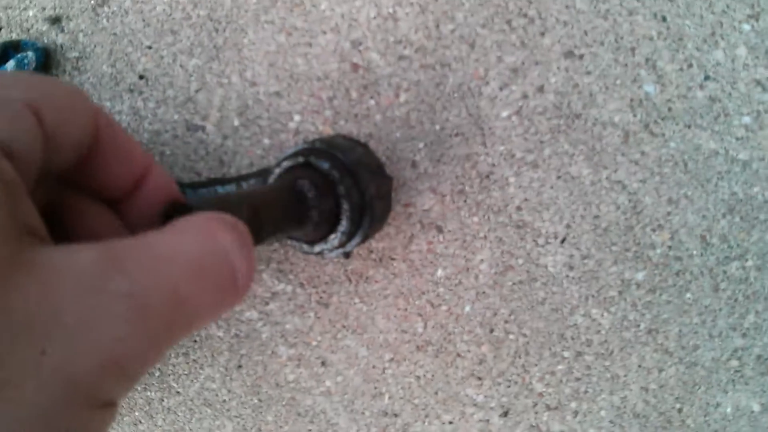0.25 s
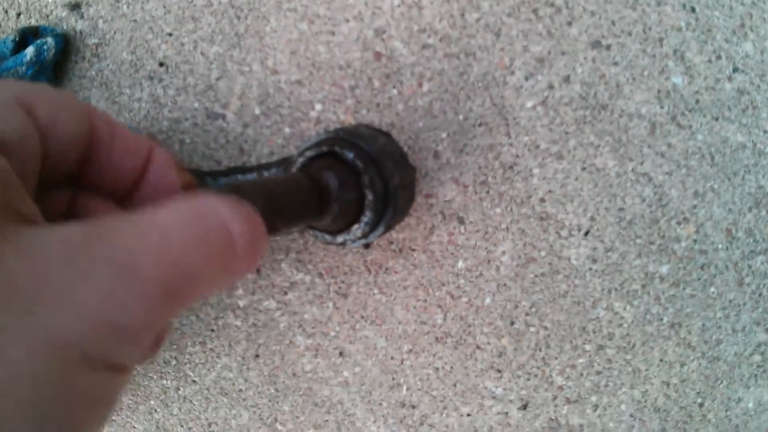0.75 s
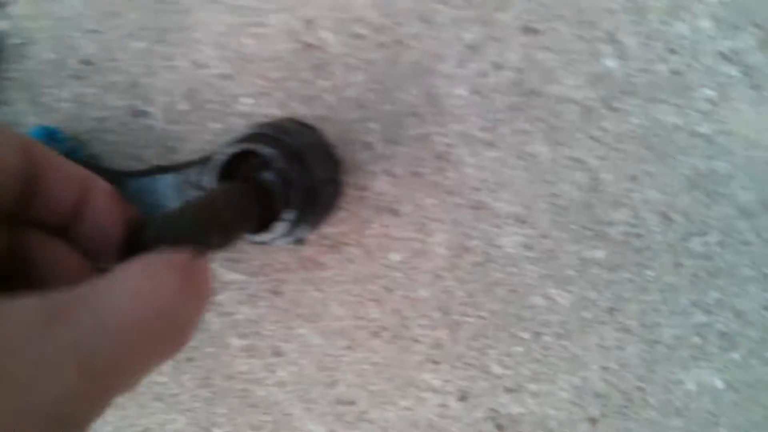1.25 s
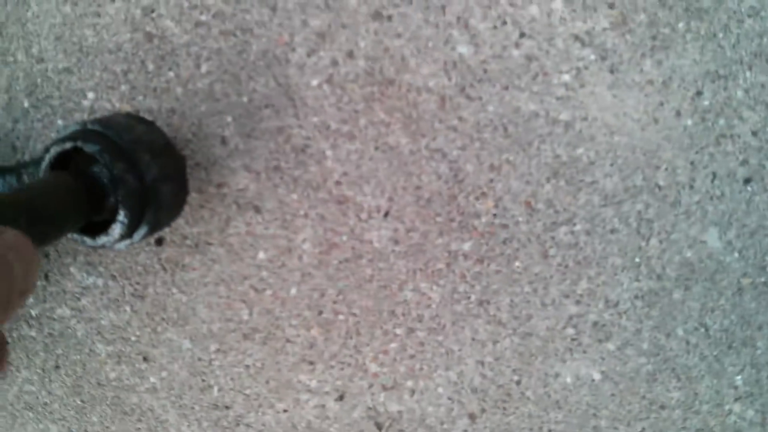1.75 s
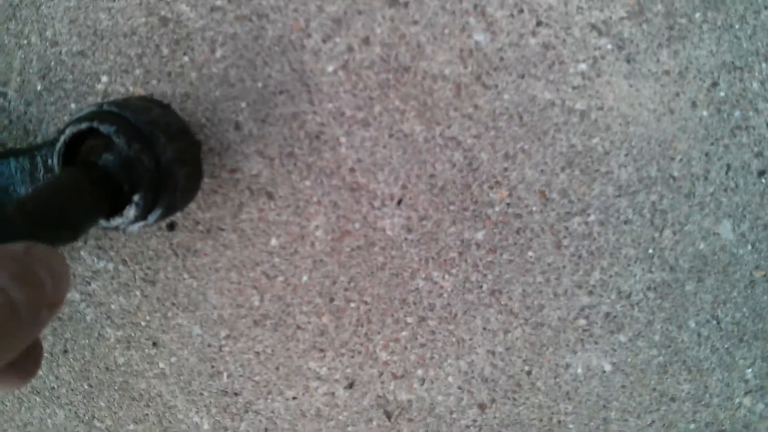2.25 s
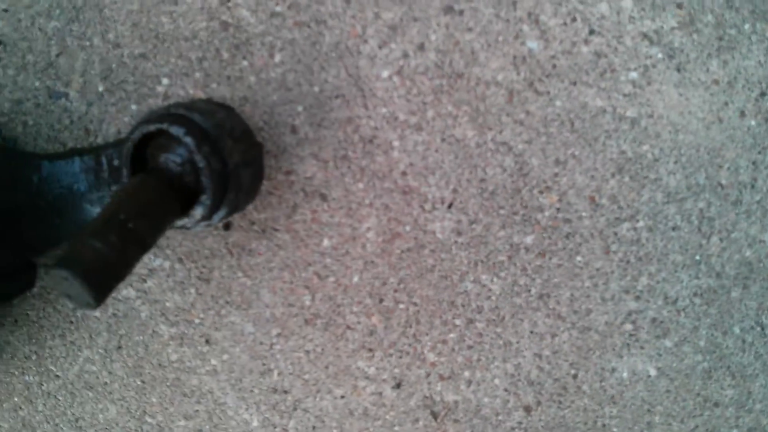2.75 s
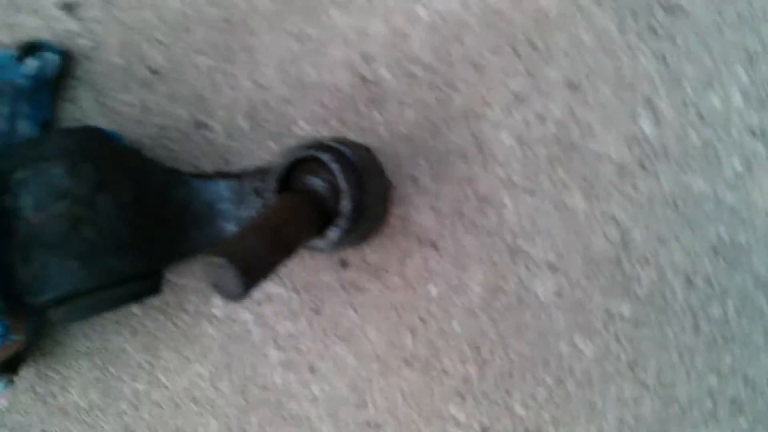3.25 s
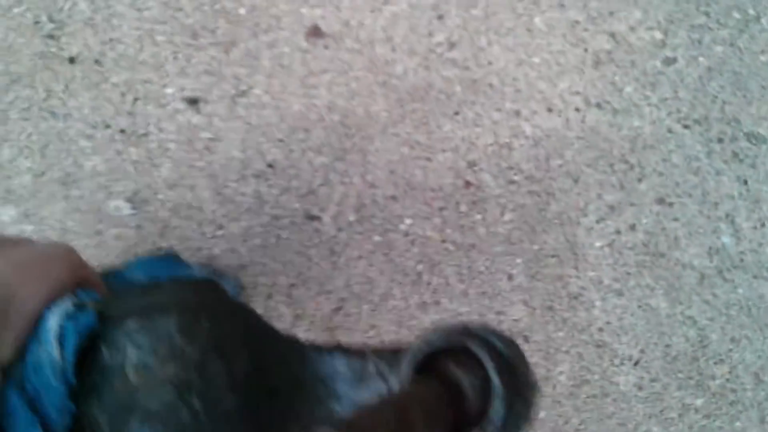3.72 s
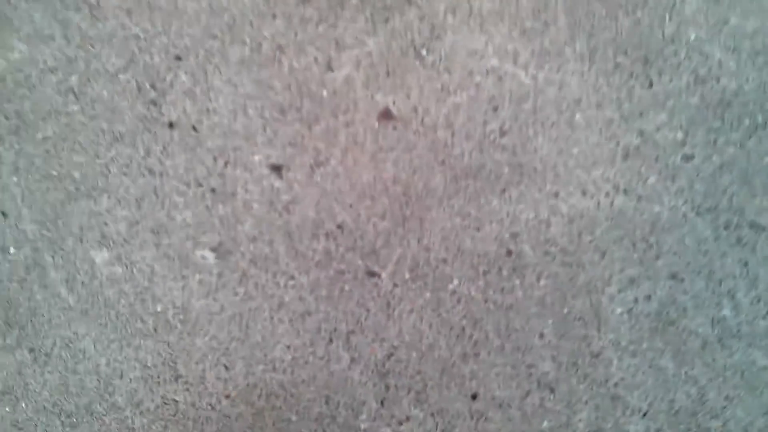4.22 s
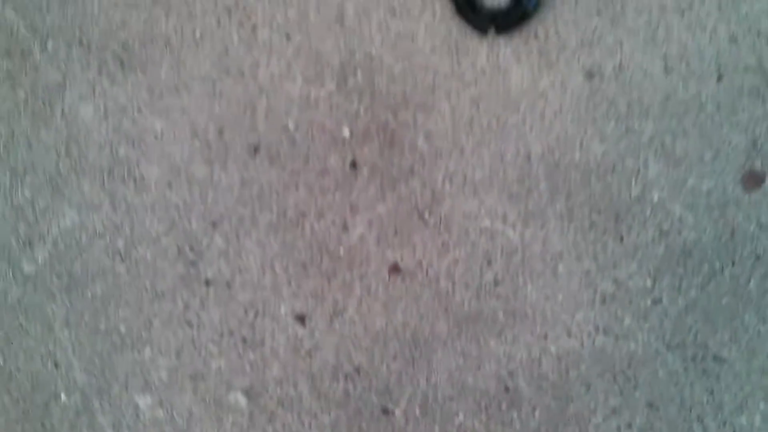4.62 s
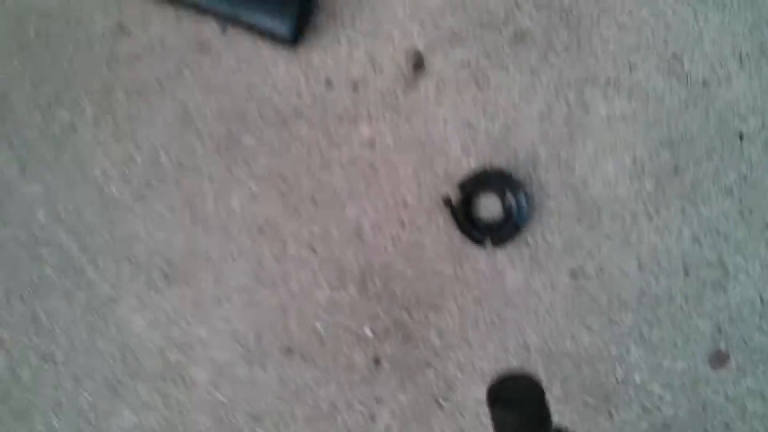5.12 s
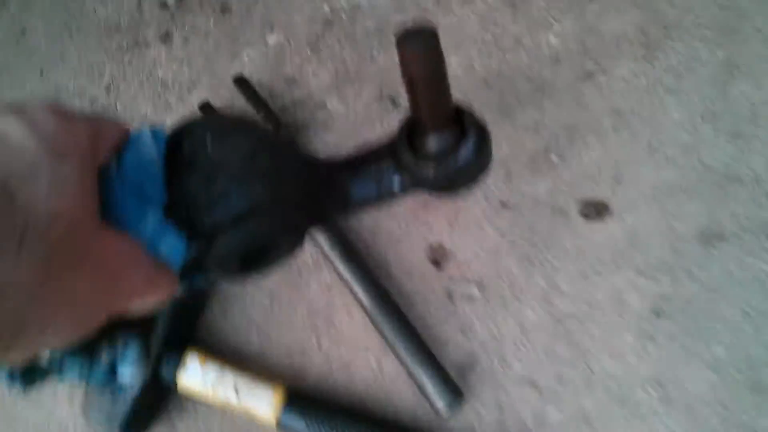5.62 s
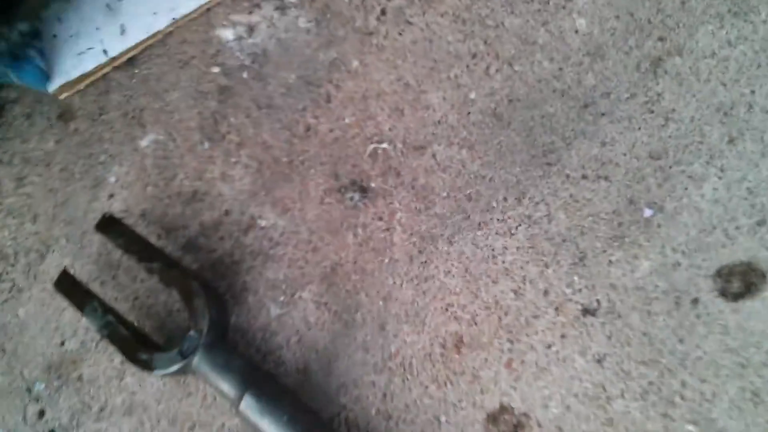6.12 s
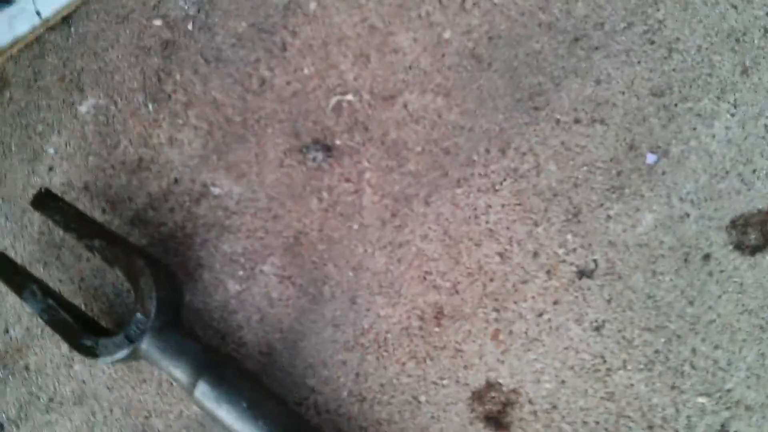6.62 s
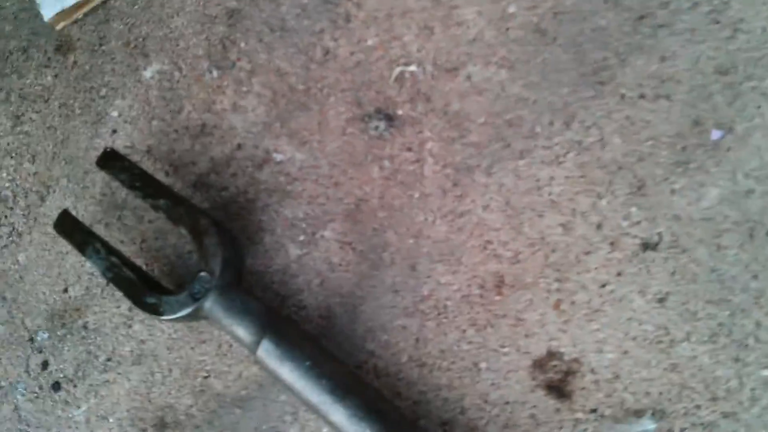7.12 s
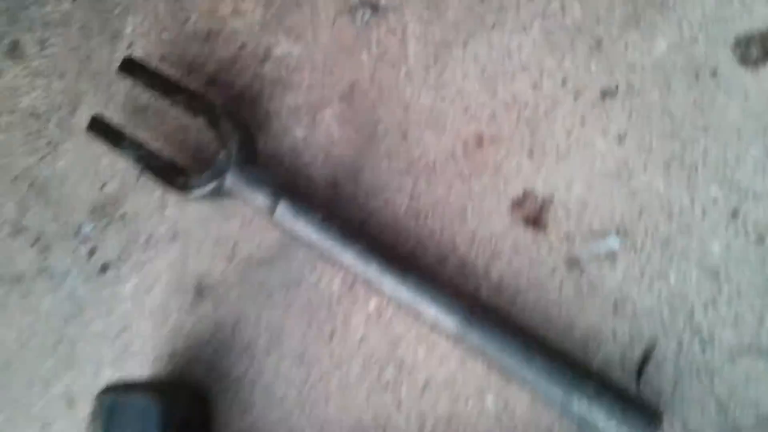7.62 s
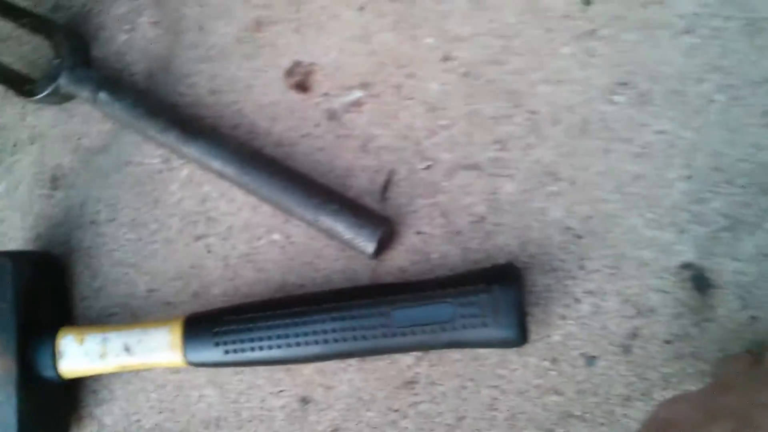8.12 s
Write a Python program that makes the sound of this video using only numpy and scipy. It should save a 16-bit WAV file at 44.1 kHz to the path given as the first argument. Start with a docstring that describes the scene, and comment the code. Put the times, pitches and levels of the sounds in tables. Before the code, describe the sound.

Over dull outdoor rumble, a faint drone and light hiss, a metal stud clicks and rubs in its socket close to the microphone. It pauses, then steel scrapes down on the concrete with a brief high ring. Two bursts of loud, crunching tool blows and ticks follow, slightly rounded off by the microphone, with a short garage reflection, light final ticks and a soft swish.

```python
"""A worn ball joint is waggled by hand over a garage floor: it clacks, and short ringing clinks near 2.5 kHz
and faint high ringing rubs sound at the same time. The steel part is then put down, skidding with a short
bright ring, and hand tools are knocked about on the concrete. Ringing modes make the clinks and the skid;
coloured noise makes the rubbing and the knocks. Soft swishes come among the last knocks and at the end. Dull
outdoor noise, a far whir, a faint drone and a soft hiss lie underneath throughout; the close microphone rounds
off the loudest blows."""
import sys
import numpy as np
from scipy import signal
from scipy.fft import rfft, irfft, next_fast_len
from scipy.io import wavfile

SR = 44100
rng = np.random.default_rng(int(sys.argv[2]) if len(sys.argv) > 2 else 0)


def dump(signal):
    """Clip the signal to [-1, 1] and save it as 16-bit WAV at the path in sys.argv[1]."""
    limited = np.clip(np.atleast_2d(signal).T, -1, 1)
    pcm = np.round(limited * 32767).astype(np.int16)
    wavfile.write(sys.argv[1], SR, pcm)


N = 368676
TIME = np.arange(N) / SR  # seconds


def from_db(db):
    """Turn decibels into a gain."""
    return 10 ** (np.asarray(db) / 20)


def rms_one(x):
    """Scale a sound to unit power."""
    return x / np.sqrt(np.mean(x ** 2) + 1e-20)


def follow(rows):
    """Join the points of a (time, value) table into one value per sample."""
    return np.interp(TIME, *np.transpose(rows))


def colour(points, hz):
    """Gain of a spectrum drawn through (frequency, dB) points."""
    knots, db = np.transpose(points)
    return from_db(np.interp(np.log(hz + 1), np.log(knots), db))


def resonances(peaks, hz):
    """Gain of damped resonances, with their powers summed."""
    power = sum(from_db(db) ** 2 / (1 + (2 * (hz - centre) / width) ** 2) for centre, width, db in peaks)
    return np.sqrt(power)


def noise(gain_at, size, grain_db=0):
    """Coloured noise of unit power; uneven grain sizes make it gritty."""
    grains = rng.standard_normal(size) * from_db(grain_db * rng.standard_normal(size))
    padded = next_fast_len(size)
    hz = np.arange(padded // 2 + 1) * SR / padded
    filtered = irfft(rfft(grains, padded) * gain_at(hz), padded)
    return rms_one(filtered[:size])


def flutter(rate_hz, size):
    """Random motion of unit spread, mostly slower than rate_hz."""
    return noise(lambda hz: 1 / (1 + (hz / rate_hz) ** 2), size)


def narrow_noise(hz, blur_hz):
    """Noise of unit power gathered around a pitch that follows hz."""
    phase = 2 * np.pi * np.cumsum(hz) / SR
    return flutter(blur_hz, len(hz)) * np.cos(phase) + flutter(blur_hz, len(hz)) * np.sin(phase)


def blow(t, rise_s, t60_s):
    """Loudness of a blow: it grows while the contact builds, then falls 60 dB in t60_s."""
    rise_s = max(rise_s, 1 / SR)
    return np.minimum(t / rise_s, 1) * from_db(-60 * np.maximum(t - rise_s, 0) / t60_s)


def strokes(rows, attack_t60_s, release_t60_s):
    """Gain of sliding strokes: each fades in before its time, changes steadily in level, and dies away."""
    out = np.zeros(N)
    for s, length_s, db, swell_db in rows:
        t = TIME - s
        away = np.maximum(-t, 0) / attack_t60_s + np.maximum(t - length_s, 0) / release_t60_s
        near = away < 1  # beyond this the stroke is 60 dB down
        stroke_db = db + swell_db * np.clip(t[near] / length_s, 0, 1) - 60 * away[near]
        out[near] += from_db(stroke_db)
    return out


def add(track, s, sound):
    """Lay a sound into a track at time s."""
    start = round(s * SR)
    track[start:start + len(sound)] += sound[:N - start]


# colours of the three background noises: (frequency [Hz], gain [dB])
RUMBLE_COLOUR = [(20, -9), (45, 0), (90, -0.5), (140, -2), (200, 0.5), (420, -5), (560, -8.5), (720, -13),
                 (1200, -17.5), (3000, -43), (6000, -52)]
WHIR_COLOUR = [(400, -20), (750, -1.5), (950, -2.5), (1300, -11.5), (2200, -18), (3100, -43.5),
               (6000, -41.5)]
HISS_COLOUR = [(1500, -31), (3100, -23.5), (4500, -14.5), (5700, -8), (7000, -3), (8000, 0), (10000, -7),
               (12500, -9), (16000, -17.5)]
# their loudness, before the trims below: (time [s], level [dB])
RUMBLE_LEVEL = [(0.0, -47), (0.61, -47), (0.91, -46), (1.56, -46), (1.84, -46), (2.3, -45), (3.26, -50.5),
                (4.38, -47), (5.35, -52), (7.24, -49), (7.36, -45), (7.71, -49), (8.03, -46.5),
                (8.36, -46.5)]
WHIR_LEVEL = [(0, -52), (.35, -50), (1.9, -55), (2.35, -46), (2.8, -52), (4.7, -56), (5.2, -55),
              (6.3, -56.5), (7.0, -61), (8.36, -60)]
HISS_LEVEL = [(0.0, -48), (0.28, -51.5), (2.02, -47), (3.28, -50), (3.98, -46), (4.42, -46), (5.03, -49),
              (5.35, -42.5), (6.08, -49), (6.38, -50), (6.49, -43.5), (6.82, -47.5), (7.24, -50.5),
              (7.38, -42), (7.66, -46), (8.36, -51)]
RUMBLE_TRIM_DB, WHIR_TRIM_DB, HISS_TRIM_DB = 0, -1.0, 0.5
# pitch of the whine in the far whir: (time [s], frequency [Hz])
WHINE_PITCH = [(0, 935), (1.5, 919), (2.5, 951), (3.1, 887), (4.2, 870), (5.0, 986), (5.5, 1026),
               (6.2, 939), (8.36, 909)]


def background(whine_db=-3.5, whine_blur_hz=50):
    """Three coloured noises make outdoor rumble, far whir and soft hiss; narrow noise whines in the whir."""
    out = np.zeros(N)
    for level_rows, points, trim_db in ((RUMBLE_LEVEL, RUMBLE_COLOUR, RUMBLE_TRIM_DB),
                                        (WHIR_LEVEL, WHIR_COLOUR, WHIR_TRIM_DB),
                                        (HISS_LEVEL, HISS_COLOUR, HISS_TRIM_DB)):
        out += from_db(follow(level_rows) + trim_db) * noise(lambda hz: colour(points, hz), N)
    whine = narrow_noise(follow(WHINE_PITCH), whine_blur_hz)
    return out + from_db(follow(WHIR_LEVEL) + whine_db) * whine


# steady notes that rise and fall with the rumble: (frequency [Hz], level against RUMBLE_LEVEL [dB])
DRONE_NOTES = [(205, -10.5), (410, -15)]
# swells: (middle time [s], length [s], level of lower note [dB], lower note [Hz], upper note [Hz])
DRONE_SWELLS = [(0.798, .45, -46.5, 245, 290), (1.0, 0.33, -45, 330, 520), (1.421, 0.82, -47.5, 285, 456.5),
                (2.298, 0.54, -54, 235, 398), (4.251, .45, -51.5, 255, 493), (6.85, .5, -51.5, 200, 296),
                (8.049, .8, -49.5, 345.3, 417), (8.36, .3, -46.5, 170, 344)]


def drone(upper_db=0.5, blur_hz=32):
    """Two low, blurred notes within the rumble, with slow swells at other pitches."""
    notes = sum(from_db(db) * narrow_noise(np.full(N, hz), blur_hz) for hz, db in DRONE_NOTES)
    out = from_db(follow(RUMBLE_LEVEL)) * notes
    for s, length_s, db, lower_hz, upper_hz in DRONE_SWELLS:
        swell = np.hanning(round(length_s * SR))
        lower = narrow_noise(np.full(len(swell), lower_hz), blur_hz)
        upper = narrow_noise(np.full(len(swell), upper_hz), blur_hz)
        add(out, s - length_s / 2, from_db(db) * swell * (lower + from_db(upper_db) * upper))
    return out


GARAGE_T60_S, GARAGE_DB = 0.31, -14.5
# colour of the sound coming back from the walls: (frequency [Hz], gain [dB])
WALL_COLOUR = [(100, 8), (1000, 3.5), (2500, -3), (6000, 3.5), (10000, -5), (16000, -4.5)]


def garage(x, rise_s=0.0061):
    """The walls answer with a faint diffuse tail, made of fading coloured noise."""
    t = TIME[:SR]
    tail = noise(lambda hz: colour(WALL_COLOUR, hz), len(t)) * blow(t, rise_s, GARAGE_T60_S)
    return from_db(GARAGE_DB) * signal.fftconvolve(x, tail / np.linalg.norm(tail))[:N]


# swishes as the hand moves about:
# (middle time [s], length [s], level of the slide [dB], start pitch [Hz], end pitch [Hz])
SWISHES = [(6.664, 0.22, -49, 4600, 3800), (8.239, 0.3, -52, 4600, 3570)]


def swishes(blur_hz=330, rustle_db=-0.5, rustle_blur_hz=1100, rustle_ratio=1.4, patchy_db=1.5, patchy_hz=30):
    """Soft, uneven sliding noises that sink in pitch, with a broader rustle above."""
    out = np.zeros(N)
    for s, length_s, db, start_hz, end_hz in SWISHES:
        hz = np.linspace(start_hz, end_hz, round(length_s * SR))
        rustle = narrow_noise(rustle_ratio * hz, rustle_blur_hz)
        slide = narrow_noise(hz, blur_hz) + from_db(rustle_db) * rustle
        level = from_db(db + patchy_db * flutter(patchy_hz, len(hz)))
        add(out, s - length_s / 2, level * np.hanning(len(hz)) * slide)
    return out


# steel landing flat on the concrete: (time [s], level [dB], t60 [s])
THUDS = [(5.671, -23.5, 0.083), (5.8114, -21, 0.041), (6.384, -21.5, 0.1), (7.195, -23.5, 0.16),
         (7.24, -12, 0.12)]
THUD_RISE_S, THUD_LOW_DB, THUD_SPARKLE_DB = 0.0008, 20, -15
# hard blows on the concrete: (time [s], level [dB], rise [s], sparkle [dB])
STRIKES = [(6.3485, -1.5, 0.00063, 6.5), (6.4506, -23.5, .0005, -3), (7.251, -7.5, .005, 6.5),
           (7.315, -19, 0.0026, -2), (7.3887, -10.5, 0.00066, -6), (7.557, -38, .001, -12)]
STRIKE_T60_S, STRIKE_LOW_DB = 0.064, 1
# an edge ticking on the floor as a tool rocks: (time [s], level [dB])
TICKS = [(5.353, -36), (6.385, -17.5), (6.434, -14), (6.448, -8), (7.212, -10.5), (7.217, -13),
         (7.306, -16.5), (7.313, -17), (7.383, -22), (7.887, -35), (7.952, -34.5)]
TICK_RISE_S, TICK_T60_S, TICK_LOW_DB, TICK_SPARKLE_DB = .0005, 0.027, -6.5, 9.5
# steel scuffing over grit until it stops: (time [s], level [dB], rise [s], t60 [s], thud [dB])
SCUFFS = [(5.338, -27.5, 0.007, 0.19, -5), (5.473, -26, 0.0046, .098, -21),
          (5.802, -27.5, 0.0054, 0.092, 11), (6.341, -27, 0.0064, .05, 5),
          (6.4057, -19, 0.00092, 0.17, -1.5), (7.204, -20.5, 0.0089, 0.35, 4),
          (7.306, -27, 0.0072, 0.29, 11.5)]
SCUFF_SPARKLE_DB = -1.5


def floor_contacts():
    """Every meeting of steel and concrete as (time s, level dB, rise s, t60 s, thud dB, sparkle dB)."""
    thuds = [(s, db, THUD_RISE_S, t60, THUD_LOW_DB, THUD_SPARKLE_DB) for s, db, t60 in THUDS]
    strikes = [(s, db, rise, STRIKE_T60_S, STRIKE_LOW_DB, sparkle) for s, db, rise, sparkle in STRIKES]
    ticks = [(s, db, TICK_RISE_S, TICK_T60_S, TICK_LOW_DB, TICK_SPARKLE_DB) for s, db in TICKS]
    scuffs = [(s, db, rise, t60, thud, SCUFF_SPARKLE_DB) for s, db, rise, t60, thud in SCUFFS]
    return thuds + strikes + ticks + scuffs


FLOOR_HZ = 310  # pitch below which the concrete hardly gives
# colour of crushed grit under steel: (frequency [Hz], gain [dB])
GRIT_COLOUR = [(25, -10), (70, -5), (150, -0.5), (260, -5), (400, -5.5), (900, -2.5), (1500, 2),
               (2300, 0.5), (3200, -8), (4300, -3), (5900, 1), (8000, -1), (10000, -2.5), (13500, -2.5),
               (16000, -9.5)]
# short resonances of tool and floor, before body_db: (frequency [Hz], width [Hz], gain [dB])
TOOL_PEAKS = [(340, 29, -2), (809, 35, -8.5), (1100, 31, -16.5), (3040, 120, -13.5), (3390, 66, 0.5),
              (3710, 110, -0.5), (4130, 46, -2.5), (4360, 120, -6), (4500, 68, -7), (4910, 170, -3),
              (5680, 190, -5.5), (5700, 110, 0), (7030, 98, -2), (8130, 62, -1)]


def knocks(thud_hz=1350, graze_hz=4200, sparkle_hz=9000, grain_db=5.5, body_db=8.0, chatter_hz=350):
    """Each blow crushes grit, a gritty noise: a flat landing thuds, a graze is thin, an edge sparkles."""
    spot_db, spot_width_hz, chatter_db = 2.0, 170, 1.4
    out, t = np.zeros(N), TIME[:SR // 3]
    grid_hz = np.arange(0, SR / 2, spot_width_hz)
    for s, db, rise_s, t60_s, thud_db, sparkle_db in floor_contacts():
        # every spot on the steel favours other modes
        spot = from_db(spot_db * rng.standard_normal(len(grid_hz)))

        def gain_at(hz):
            corner_hz = thud_hz if thud_db > 0 else graze_hz
            low_db = thud_db / (1 + (hz / corner_hz) ** 6)
            high_db = sparkle_db * (1 - 1 / (1 + (hz / sparkle_hz) ** 6))
            body = 1 + from_db(body_db) * resonances(TOOL_PEAKS, hz)
            # the floor is too stiff for a thud to add deep bass
            stiff = hz ** 2 / (hz ** 2 + FLOOR_HZ ** 2) if thud_db > 0 else 1
            tilt = from_db(low_db * stiff + high_db)
            return colour(GRIT_COLOUR, hz) * tilt * body * np.interp(hz, grid_hz, spot)

        chatter = from_db(chatter_db * flutter(chatter_hz, len(t)))
        crushing = noise(gain_at, len(t), grain_db)
        add(out, s, from_db(db) * blow(t, rise_s, t60_s) * chatter * crushing)
    return out


# steel dragged over the floor: (time [s], length [s], starting level [dB], change over the stroke [dB])
DRAGS = [(5.13, 0.1, -40.5, 7), (5.703, 0.03, -15.5, -4)]
DRAG_ATTACK_T60_S, DRAG_RELEASE_T60_S = 0.055, 0.093
# colour of dragging: (frequency [Hz], gain [dB])
SCRAPE_COLOUR = [(200, -16), (1000, -17.5), (2000, -5.5), (3400, -10), (5300, 1.5), (8000, 1),
                 (11000, -2.5), (16000, -11.5)]
# modes that the skid builds up: (frequency [Hz], level [dB], time of fullest ring [s], t60 [s])
SKID_MODES = [(3020, -20, 5.708, .09), (5303, -8, 5.724, .07), (5412, -21, 5.72, .1),
              (5976, -9, 5.708, .09), (6060, -22, 5.715, .11), (9850, -24, 5.712, .11),
              (14210, -25, 5.725, .1)]


def skid(build_s=0.0063, slip_hz=120, grain_db=1.0):
    """Dragging rasps; stick and slip pump the steel's modes, which then ring out."""
    waver_rad, judder_db = .45, 2.0
    level = strokes(DRAGS, DRAG_ATTACK_T60_S, DRAG_RELEASE_T60_S)
    rasp = noise(lambda hz: colour(SCRAPE_COLOUR, hz), N, grain_db)
    out = level * from_db(judder_db * flutter(slip_hz, N)) * rasp
    t = TIME[:SR // 2] - TIME[SR // 10]  # zero at the fullest ring
    for hz, db, fullest_s, t60_s in SKID_MODES:
        swell = np.exp(np.minimum(t, 0) / build_s) * from_db(-60 * np.maximum(t, 0) / t60_s)
        mode = np.sqrt(2) * np.sin(2 * np.pi * hz * t + waver_rad * flutter(slip_hz, len(t)))
        judder = from_db(db + judder_db * flutter(slip_hz, len(t)))
        add(out, fullest_s + t[0], judder * swell * mode)
    return out


# steel on steel, damped by the hand: (time [s], level [dB], main resonance [Hz])
CLACKS = [(0.136, -39.5, 1320), (0.2759, -28.5, 5120), (0.302, -29, 3620), (0.3096, -31, 3900),
          (1.073, -49, 2170), (1.548, -38, 3030), (2.4053, -25.5, 2970), (2.4384, -18, 4250),
          (2.5695, -34.5, 5770), (6.536, -30.5, 1823), (6.5507, -18.5, 5700)]
# colour of the crunch in a clack: (frequency [Hz], gain [dB])
CRUNCH_COLOUR = [(500, -24), (1100, -20.5), (1500, 5.5), (3200, 3), (5500, -6.5), (9000, -6.5),
                 (16000, -15)]
# damped modes shared by the clacks: (frequency [Hz], typical level against the main resonance [dB])
CLACK_MODES = [(1400, -18.5), (1770, -9.5), (2050, -25), (2580, -6.5), (3020, -17.5), (3260, -17.5),
               (4450, -18.5), (6280, -13.5), (7900, -20.5)]
# a full-scale clack dies this fast; lighter ones are pressed less and ring longer
CLACK_T60_S, CLACK_DB_PER_DOUBLING = .03, 22.5


def clacks(crunch_db=-9.5, rise_s=0.00077, rattle_rad=1.2, rattle_hz=420):
    """One mode, blurred by rattling, stands out of a crowd of damped ones; the contact adds a crunch."""
    out, t = np.zeros(N), TIME[:SR // 5]
    for s, db, main_hz in CLACKS:
        t60_s = CLACK_T60_S * 2 ** (-db / CLACK_DB_PER_DOUBLING)
        sound = np.sin(2 * np.pi * main_hz * t + rattle_rad * flutter(rattle_hz, len(t)))
        sound += from_db(crunch_db) * noise(lambda hz: colour(CRUNCH_COLOUR, hz), len(t))
        for hz, mode_db in CLACK_MODES:
            gain = from_db(mode_db + 2 * rng.normal())  # every clack mixes the modes a little differently
            sound += gain * np.sin(2 * np.pi * (hz * t + rng.random()))
        add(out, s, from_db(db) * blow(t, rise_s, t60_s) * sound)
    return out


# faint high ringing rubs, before RUB_TRIM_DB: (time [s], length [s], level [dB])
RUBS = [(0.6, 0.041, -62), (0.666, 0.074, -49.5), (0.796, 0.052, -53), (0.936, 0.041, -50.5),
        (1.035, 0.149, -54)]
RUB_ATTACK_T60_S, RUB_RELEASE_T60_S, RUB_TRIM_DB = 0.082, 0.11, 2
# resonances that the rubbing wakes: (frequency [Hz], width [Hz], gain [dB])
RUB_PEAKS = [(2500, 120, -11), (7950, 170, 4), (12360, 350, 4.5)]


def ringing_rubs(grain_db=7.0, catch_db=3.0, catch_hz=40):
    """Fine, catching, gritty noise keeps a few high resonances faintly singing."""
    steady_rubs = [(s, length_s, db, 0) for s, length_s, db in RUBS]
    level = strokes(steady_rubs, RUB_ATTACK_T60_S, RUB_RELEASE_T60_S)
    catching = from_db(RUB_TRIM_DB + catch_db * flutter(catch_hz, N))
    return catching * level * noise(lambda hz: resonances(RUB_PEAKS, hz), N, grain_db)


# short ringing clinks near 2.5 kHz: (time [s], level [dB], brightness [dB per octave above the strongest mode])
CLINKS = [(0.1355, -34, -2), (0.2779, -6.5, -0.5), (0.301, -33.5, 12.5), (0.575, -31.5, -13),
          (1.075, -43, 2), (1.5465, -18, -2.5), (2.009, -48, 16.5), (2.243, -45, -2), (2.4056, -14, -8),
          (2.422, -24.5, 1)]
# ring of the clinks, before brightness and choking: (frequency [Hz], level [dB], t60 [s])
RING_MODES = [(1383, -24, .07), (2451, -4, 0.13), (2580, -7, 0.1), (3590, -27, 0.075), (7470, -12, 0.032),
              (7950, -17.5, .045), (8450, -24, .04), (12400, -25, 0.028)]
CHOKE_AFTER_S = 0.0098  # time after which the ring is cut short


def ringing_clinks(rise_s=.0013, choke_t60_s=0.014):
    """Each clink rings briefly, then its ring is cut short."""
    out, t = np.zeros(N), TIME[:SR // 5]
    strongest_hz = max(RING_MODES, key=lambda mode: mode[1])[0]
    choke = from_db(-60 * np.maximum(t - CHOKE_AFTER_S, 0) / choke_t60_s)
    for s, db, bright_db in CLINKS:
        ring = np.zeros(len(t))
        for hz, mode_db, t60_s in RING_MODES:
            gain = from_db(mode_db + bright_db * np.log2(hz / strongest_hz))
            ring += gain * blow(t, rise_s, t60_s) * np.sin(2 * np.pi * hz * t)
        add(out, s, from_db(db) * ring * choke)
    return out


CLACK_ROOM_DB = -4  # the hand shields the clacks from the walls
SKID_ROOM_DB = -5  # level of the skid sent to the walls


def scene():
    """Steel handled close by, in the garage, over the background."""
    handling = ringing_clinks() + ringing_rubs() + knocks()
    clacking, sliding = clacks(), skid()
    room = garage(handling + from_db(CLACK_ROOM_DB) * clacking + from_db(SKID_ROOM_DB) * sliding)
    mix = handling + clacking + sliding + room + swishes() + background() + drone()
    return mix[None]


CUTOFF_HZ = 15900


def record(dry, top=0.7):
    """The close microphone rounds off loud peaks, and the highest treble is cut."""
    low_pass = signal.ellip(8, .05, 45, CUTOFF_HZ, fs=SR, output="sos")
    rounded = top * np.tanh(dry / top)
    return signal.sosfiltfilt(low_pass, rounded)


dry = scene()
out = record(dry)
dump(out)
```